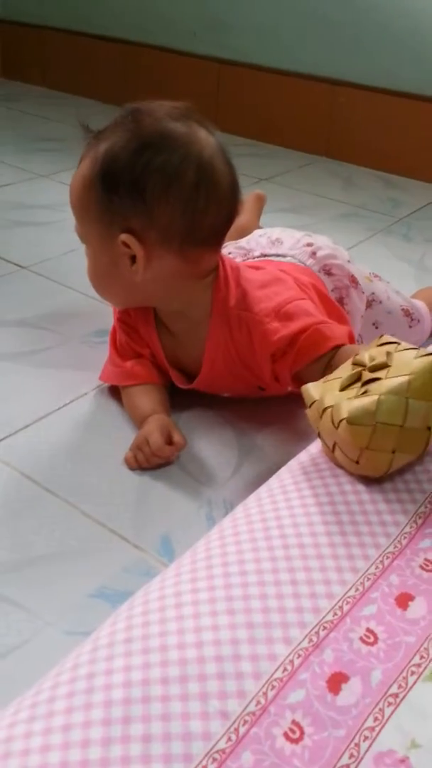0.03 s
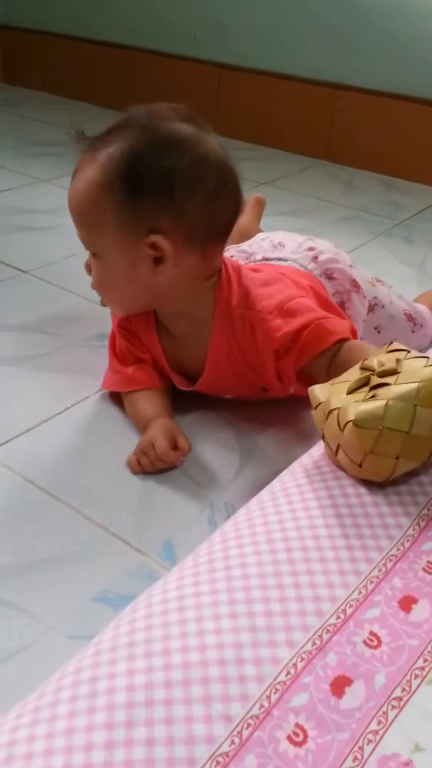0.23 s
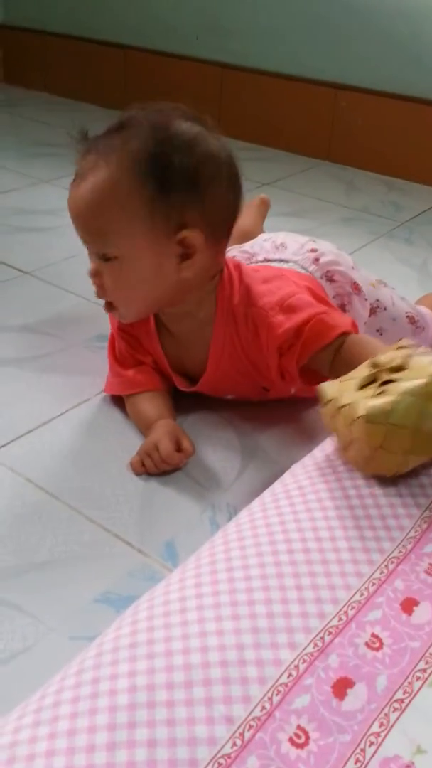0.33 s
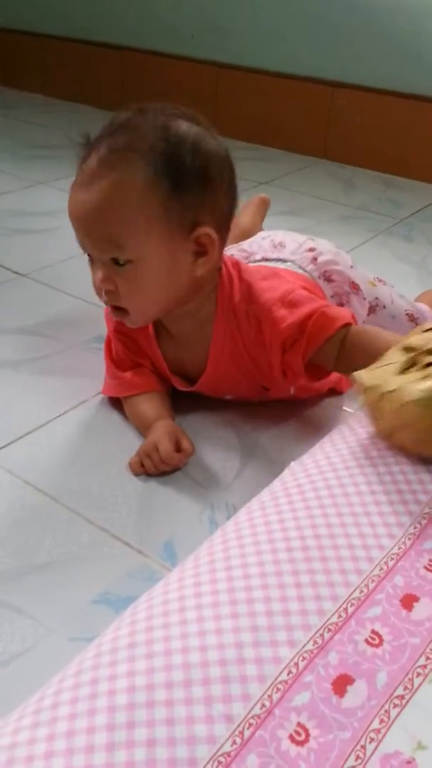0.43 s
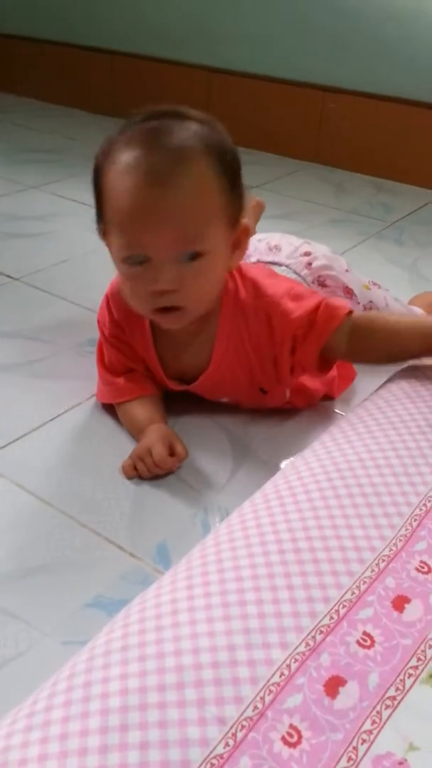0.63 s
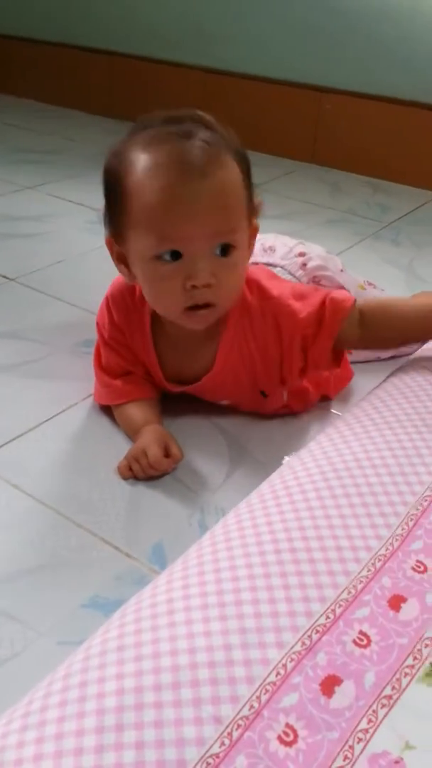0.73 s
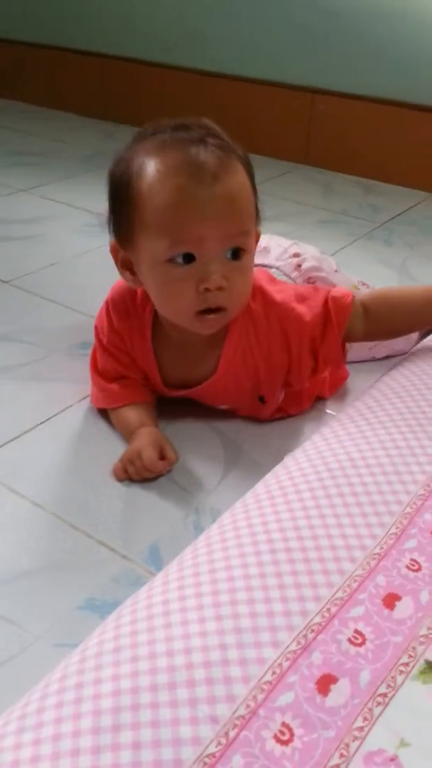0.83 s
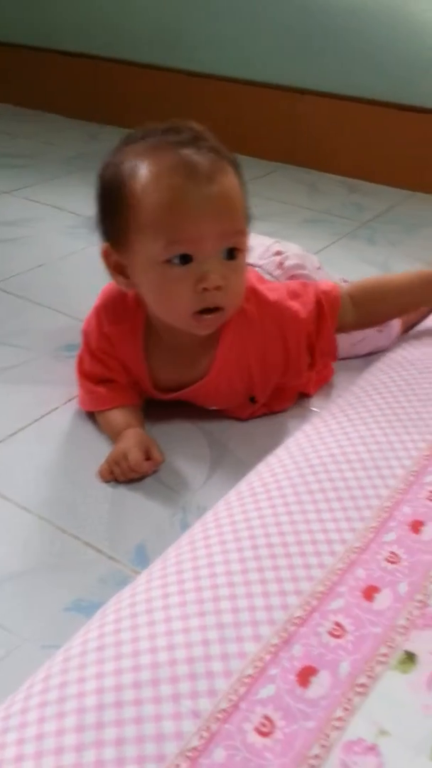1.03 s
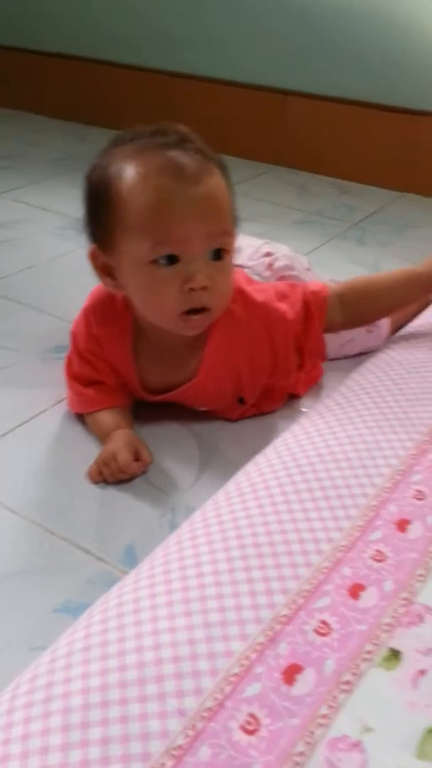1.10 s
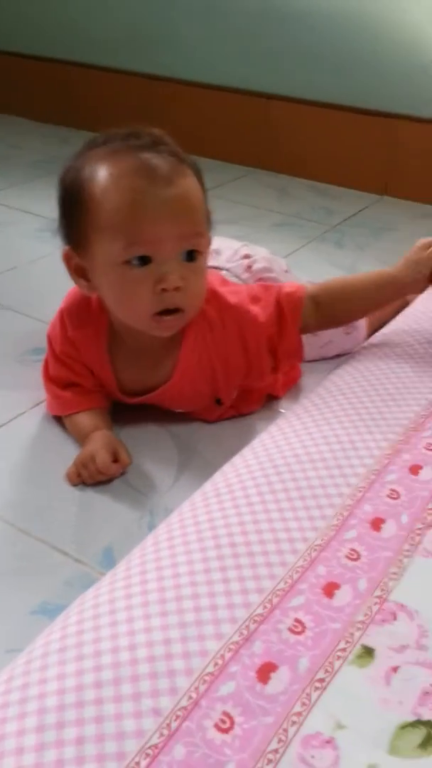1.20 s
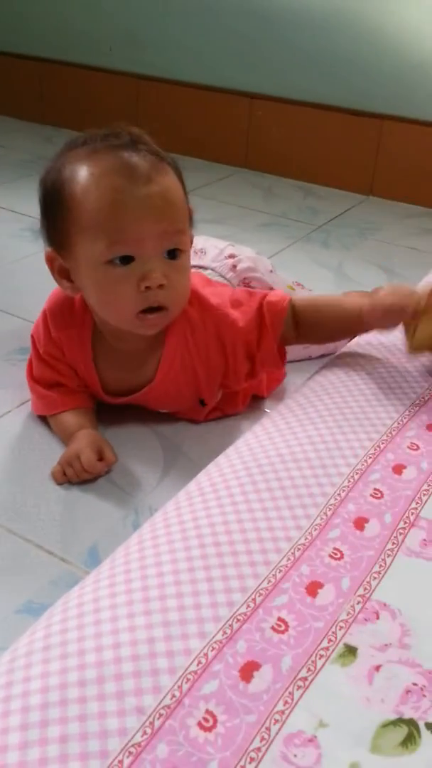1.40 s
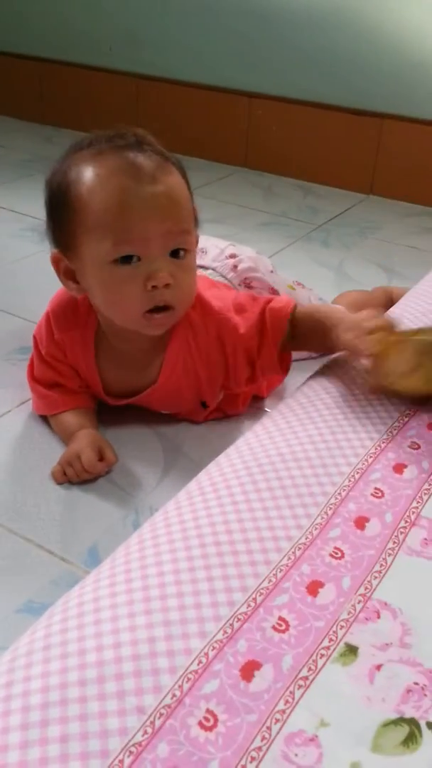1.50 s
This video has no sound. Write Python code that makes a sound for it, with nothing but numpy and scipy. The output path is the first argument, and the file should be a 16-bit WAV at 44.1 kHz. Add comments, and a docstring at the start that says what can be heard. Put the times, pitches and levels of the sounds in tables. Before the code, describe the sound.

A woven basket thumps onto a thin mat at about 0.25 seconds, its dry strips snapping and creaking. From 0.4 to 1.1 seconds it scrapes over the cloth with a hiss, soft bumps and a faint hollow rumble; a zipping tone rises until 0.8 seconds, then falls away. Light brushes and a soft bump follow around 1.3 to 1.6 seconds in a small quiet room.

```python
"""Palm-leaf basket dropped and dragged

A woven basket thumps onto a thin mat over tiles; its dry strips snap and creak. Dragged across the
cloth, the strips hiss and tick over the threads: a zipping tone that rises and falls with the speed.
The stiff rim sings, the cavity hums, light brushes follow.
Small quiet room, two small microphones with peaky treble."""
import sys
import numpy as np
from scipy import signal
from scipy.fft import rfft, irfft, next_fast_len
from scipy.io import wavfile
from scipy.ndimage import uniform_filter1d

SR = 44100
rng = np.random.default_rng(int(sys.argv[2]) if len(sys.argv) > 2 else 0)


def int16_out(signal):
    """Quantize to a 16-bit WAV file."""
    q = np.round(np.clip(np.atleast_2d(signal).T, -1, 1) * 32767)
    wavfile.write(sys.argv[1], SR, q.astype(np.int16))


N = 68355
TIME_S = np.arange(N) / SR

# Room decay: freq_hz, t60_s
ROOM_DECAY = [(60, 0.31), (250, 0.13), (1000, 0.23), (4000, 0.14), (15000, 0.091)]
# Left-right likeness: freq_hz, coherence
COHERENCE = [(60, 0.84), (200, 0.95), (400, 0.88), (700, 0.019), (1300, 0.33), (2300, 0), (15000, 0)]
# Room air: freq_hz, density_db
AIR_SPECTRUM = [(20, -51.5), (45, -6.5), (68, -5.5), (110, -5.5), (220, -14), (400, -15), (1000, -24.5),
                (3000, -27), (5500, -28), (7000, -31), (9000, -35), (12500, -27), (13900, -23.5),
                (14700, -34)]
# Faint background tones: pitch_hz, level_db, start_s
FAINT_TONES = [(215, -81.5, 0.055), (880, -88.5, 0.98), (855, -80, 1.25), (1625, -83, 1.306)]
# Strokes on the cloth: peak_s, level_db, rise_s, fall_s
BRUSH_STROKES = [(.19, -74, 0.059, 0.09), (0.286, -51, 0.0069, 0.01), (1.318, -64, 0.047, .04),
                 (1.464, -54, 0.0095, 0.042), (1.548, -50, 0.041, .06)]
# Brush friction: freq_hz, density_db
BRUSH_SPECTRUM = [(60, 2), (300, 3.5), (700, 1.5), (1500, 1), (2300, -2), (3200, -1), (4100, -3), (5700, 2),
                  (7500, 3), (10000, -4), (15000, -2)]
# Soft floor bumps: peak_s, level_db, half_width_s
FLOOR_BUMPS = [(0.128, -68, 0.022), (0.525, -42, 0.0086), (0.621, -50.5, 0.025), (1.396, -54.5, 0.015)]
# Rim swish: freq_hz, density_db
RIM_SPECTRUM = [(1000, -35), (3900, -13.5), (4700, 3), (5500, 1.5), (6200, -24), (9000, -38)]
# Surges of the cavity note: peak_s, level_db, half_width_s
CAVITY_SURGES = [(0.664, -48.5, 0.065), (0.769, -43.5, 0.03)]
# Landing blows: start_s, thud_db, contact_s, crack_db
LANDING_BLOWS = [(0.244, -50.5, 0.0024, -41), (0.2468, -28, 0.0015, -39.5), (.2534, -38, 0.006, -41.5),
                 (0.2626, -18.5, 0.0025, -33)]
# Basket on the padded floor: freq_hz, level_db, t60_s
BASKET_MODES = [(75.4, -13.5, 0.11), (108.6, -4, 0.12), (158, -2.5, 0.1), (222, -13, 0.26),
                (278, 2.5, 0.029), (381, -10.5, 0.052), (670, -8, 0.041)]
# Snap of dry strips: freq_hz, density_db
CRACK_SPECTRUM = [(200, 2.5), (600, 7), (1300, 3), (1600, -4), (2200, 2.5), (3400, -8.5), (5200, -0.5),
                  (6300, -9), (7600, -12), (10500, -21.5), (15000, -17)]
# Drag force as levels: time_s, hiss_db, zip_db, rumble_db
DRAG_LEVELS = [(0.299, -66, -100, -69), (0.352, -61, -89, -70), (0.432, -47.5, -64.5, -55.5),
               (0.478, -43.5, -57, -74), (0.518, -39, -45.5, -49), (.59, -38.5, -51, -48.5),
               (0.651, -37, -43.5, -52), (0.696, -38, -50, -49), (0.734, -37, -37, -52),
               (.778, -35, -41.5, -48.5), (0.814, -36.5, -39, -48), (.838, -36, -48, -50.5),
               (0.866, -39.5, -38.5, -52.5), (.922, -40.5, -48.5, -50), (.955, -41, -67, -53),
               (1.014, -43, -51.5, -56), (1.052, -50, -48, -51), (1.094, -59.5, -61, -57.5),
               (1.135, -82, -94, -101)]
# Drag speed as threads crossed: time_s, rate_hz
THREAD_RATE = [(.30, 250), (.43, 720), (.49, 880), (.535, 935), (.60, 900), (.655, 925), (.695, 1020),
               (.72, 1160), (.745, 1230), (.775, 1530), (.805, 1560), (.825, 1660), (.865, 1390),
               (.905, 1160), (.93, 900), (1.01, 570), (1.045, 405), (1.075, 330), (1.135, 130)]
# Hiss before the basket swings round: freq_hz, density_db
EARLY_HISS_SPECTRUM = [(400, -8.5), (700, -7), (1100, 5.5), (1500, -2.5), (1850, 2), (2900, -4.5),
                       (3800, -2), (4700, -1.5), (5600, 0.5), (6200, -1), (7500, 4.5), (10000, -4),
                       (12500, -6.5), (15000, -11.5)]
# Hiss after the swing: freq_hz, density_db
LATE_HISS_SPECTRUM = [(400, -10.5), (700, -1.5), (1100, 0.5), (1850, 1.5), (2500, -1.5), (3500, -4.5),
                      (4800, 0.5), (5600, 1), (6150, 7), (6700, -0.5), (7700, -1), (10000, -6),
                      (12500, -8.5), (15000, -9)]
# Rumble of the hollow basket: freq_hz, density_db
RUMBLE_SPECTRUM = [(20, -52), (40, -13), (65, -4), (110, -5.5), (200, 0), (260, 1.5), (315, 0.5),
                   (380, -1.5), (450, -2.5), (620, -9.5), (1200, -43), (4000, -69)]
# Left microphone: freq_hz, gain_db
LEFT_RESPONSE = [(60, 0.5), (200, 0), (450, 0), (850, -2.5), (2000, 1.5), (3500, -3), (4600, 2.5),
                 (5750, 4.5), (6900, 0.5), (7600, -5.5), (9400, -2.5), (10200, 4), (12000, -3),
                 (14300, -0.5)]
# Right microphone: freq_hz, gain_db
RIGHT_RESPONSE = [(60, 3.5), (200, 0.5), (450, -6.5), (850, 0.5), (2100, -3.5), (3400, -1.5), (4600, -0.5),
                  (5600, -3), (6450, 1), (7000, 9), (7750, 10.5), (8400, 8), (9000, 7), (10300, 1),
                  (14300, -3)]


def amp(db):
    """Decibels to gain."""
    return 10 ** (np.asarray(db) / 20)


def unit_rms(x):
    """Scale to rms 1."""
    return x / np.sqrt(np.mean(x ** 2) + 1e-20)


def lookup(table, hz):
    """Interpolate on a log-frequency axis."""
    freq_hz, values = np.transpose(table)
    return np.interp(np.log(hz + 1), np.log(freq_hz + 1), values)


def add(mix, start_s, sound):
    """Mix a sound in at start_s."""
    part = mix[..., round(start_s * SR):][..., :sound.shape[-1]]
    part += sound[..., :part.shape[-1]]


def swell(peak_s, half_width_s):
    """Gaussian envelope, 1/e at half_width_s from the peak."""
    return np.exp(-((TIME_S - peak_s) / half_width_s) ** 2)


def phase(hz):
    """Running phase of a varying frequency, in radians."""
    return 2 * np.pi * np.cumsum(hz) / SR


def colour(x, spectrum):
    """Minimum-phase filter with the given spectrum."""
    size = 8192
    log_gain = np.log(amp(lookup(spectrum, abs(np.fft.fftfreq(size, 1 / SR)))))
    response = np.exp(np.conj(signal.hilbert(log_gain)))
    taps = np.fft.ifft(response).real[:size // 2]
    return signal.fftconvolve(x, taps.reshape((1,) * (x.ndim - 1) + (-1,)), axes=-1)[..., :x.shape[-1]]


def cohere(x):
    """Make two independent channels alike in the bass."""
    left, other = rfft(x)
    coherence = lookup(COHERENCE, np.fft.rfftfreq(x.shape[1], 1 / SR))
    right = coherence * left + np.sqrt(1 - coherence ** 2) * other
    return irfft([left, right], x.shape[1])


def wander(hz):
    """Random drift of rms 1, low-passed at hz."""
    size = next_fast_len(N)
    rolloff = 1 + (np.fft.rfftfreq(size, 1 / SR) / hz) ** 4
    return unit_rms(irfft(rfft(rng.standard_normal(size)) / rolloff, size)[:N])


def slips(spectrum, rate_hz=9000, spread_db=2.5):
    """Friction: dense, uneven micro-slips of leaf on fibre."""
    size_db = spread_db * np.minimum(rng.exponential(1, (2, N)), 5)
    signs = rng.choice([-1, 1], (2, N))
    slipping = rng.random((2, N)) < rate_hz / SR
    return unit_rms(colour(cohere(amp(size_db) * signs * slipping), spectrum))


def room(x, wet_db, build_s=0.0035):
    """Direct sound plus the short tail of the tiled room."""
    hz, t, noise = signal.stft(cohere(rng.standard_normal((2, SR // 2))), SR, nperseg=256)
    decay = amp(-60 * t / lookup(ROOM_DECAY, hz)[:, None])
    tail = signal.istft(noise * decay, SR, nperseg=256)[1]
    tail *= np.minimum(np.arange(tail.shape[1]) / SR / build_s, 1) ** 2
    tail /= np.linalg.norm(tail[0])
    return x + amp(wet_db) * signal.fftconvolve(np.atleast_2d(x), tail, axes=1)[:, :N]


def room_tone(air_db=-69, waver_hz=22, flicker_db=3, fade_in_s=0.09):
    """Low murmur of air, thin hiss, faint tones that waver and flicker."""
    out = amp(air_db) * unit_rms(colour(cohere(rng.standard_normal((2, N))), AIR_SPECTRUM))
    for pitch_hz, level_db, start_s in FAINT_TONES:
        tone = np.sqrt(2) * np.cos(phase(pitch_hz + waver_hz * wander(hz=60.4)))
        fade_in = np.clip((TIME_S - start_s) / fade_in_s, 0, 1)
        out += amp(level_db + flicker_db * wander(hz=25)) * fade_in * tone
    return out


def brushes():
    """Hand and basket stroke the cloth lightly."""
    envelope = sum(amp(level_db) * swell(peak_s, np.where(TIME_S < peak_s, rise_s, fall_s))
                   for peak_s, level_db, rise_s, fall_s in BRUSH_STROKES)
    return room(slips(BRUSH_SPECTRUM) * envelope * amp(wander(hz=119.8)), wet_db=-6.5)


def bumps(pitch_hz=75):
    """Padded knocks on the floor, a few low cycles each."""
    out = np.zeros(N)
    for peak_s, level_db, half_width_s in FLOOR_BUMPS:
        tone = np.sin(2 * np.pi * pitch_hz * (TIME_S - peak_s))
        out += amp(level_db) * swell(peak_s, half_width_s) * tone
    return room(out, wet_db=-6.5)


def rim(level_db=-53.5):
    """The stiff rim sings, a narrow swish, as the slide starts."""
    landed = TIME_S > LANDING_BLOWS[0][0]
    envelope = swell(peak_s=0.51, half_width_s=0.14) * landed
    return slips(RIM_SPECTRUM) * amp(level_db + wander(hz=60)) * envelope


def cavity(pitch_hz=315, waver_hz=22):
    """The hollow basket is rubbed into a wavering note while the pull is hardest."""
    envelope = sum(amp(level_db) * swell(peak_s, half_width_s)
                   for peak_s, level_db, half_width_s in CAVITY_SURGES)
    note = np.sqrt(2) * np.cos(phase(pitch_hz + waver_hz * wander(hz=97)))
    return room(envelope * note, wet_db=-8)


def landing(snap_db=12.5, crack_t60_s=0.0064, creak_db=-11.5, creak_t60_s=0.21):
    """Each blow rings the low modes and snaps the dry strips, which creak as they settle."""
    t = np.arange(SR // 2) / SR
    thuds, cracks = np.zeros(N), np.zeros((2, N))
    impulse = 1. * (t == 0)
    ring = -sum(amp(db - 60 * t / t60_s) * np.cos(2 * np.pi * hz * t) for hz, db, t60_s in BASKET_MODES)
    splinter_decay = amp(4 - 60 * t / crack_t60_s) + amp(creak_db - 60 * t / creak_t60_s)
    filter_gain = np.linalg.norm(colour(impulse, CRACK_SPECTRUM))
    for start_s, thud_db, contact_s, crack_db in LANDING_BLOWS:
        force = t * np.exp(-4 * t / contact_s)
        thud = signal.fftconvolve(ring, force / force.sum())[:len(t)]
        add(thuds, start_s, amp(thud_db) * thud)
        splinters = cohere(rng.standard_normal((2, len(t)))) * splinter_decay
        crack = colour(splinters + amp(snap_db) * impulse, CRACK_SPECTRUM) / filter_gain
        add(cracks, start_s, amp(crack_db) * crack)
    cracks *= amp([[1], [-1]])  # slightly left
    return room(thuds, wet_db=-14.5) + room(cracks, wet_db=-15.5)


def strip_hiss(swing_s=0.757, swing_half_width_s=0.053):
    """Strips rub the fabric, slightly right; the colour shifts as the basket swings round."""
    turned = 0.5 + 0.5 * np.tanh((TIME_S - swing_s) / swing_half_width_s)
    early = slips(EARLY_HISS_SPECTRUM) * amp([[-0.88], [0.88]])
    late = slips(LATE_HISS_SPECTRUM) * amp([[-0.5], [0.5]])
    return np.sqrt(1 - turned) * early + np.sqrt(turned) * late


def strip_tone(speed_ratio, wobble=0.034, grip_db=6, overtone_db=-18.5):
    """One strip ticks over the threads with unsteady speed and grip."""
    thread_hz = np.interp(TIME_S, *np.transpose(THREAD_RATE))
    angle = phase(thread_hz * (speed_ratio + wobble * wander(hz=118)))
    grip = amp(grip_db * np.tanh(wander(hz=71.6)))
    return grip * (np.cos(angle) + amp(overtone_db) * np.cos(2 * angle))


def thread_zip(speed_spread=0.15, fast_db=-15, slow_db=-20):
    """Zip of a leading strip, a faster and a slower one."""
    fast = amp(fast_db) * strip_tone(1 + speed_spread)
    slow = amp(slow_db) * strip_tone(1 - speed_spread)
    return unit_rms(strip_tone(1) + fast + slow)


def drag(hiss_trim_db=-2.5, zip_trim_db=-2, hiss_flicker_db=0.52, rumble_flicker_db=2):
    """The basket slides: hiss, zip and hollow rumble follow the pull."""
    times_s, *levels_db = np.transpose(DRAG_LEVELS)
    hiss_db, zip_db, rumble_db = (np.interp(TIME_S, times_s, column) for column in levels_db)
    moving = (TIME_S > times_s[0]) & (TIME_S < times_s[-1])
    gate = uniform_filter1d(1. * moving, size=600)
    hiss = strip_hiss() * amp(hiss_db + hiss_trim_db + hiss_flicker_db * wander(hz=89))
    zipping = thread_zip() * amp(zip_db + zip_trim_db)
    rumble = slips(RUMBLE_SPECTRUM) * amp(rumble_db + rumble_flicker_db * wander(hz=35))
    return room(gate * (hiss + zipping + rumble), wet_db=-9)


def scene():
    """Stereo sum of all sources."""
    return landing() + bumps() + drag() + rim() + cavity() + brushes() + room_tone()


def record(dry, low_cut_hz=39.5, band_limit_hz=14580):
    """Microphone colour, low cut, band limit."""
    heard = np.array([colour(dry[0], LEFT_RESPONSE), colour(dry[1], RIGHT_RESPONSE)])
    highpass = signal.butter(3, low_cut_hz, "high", fs=SR, output="sos")
    lowpass = signal.firwin(511, band_limit_hz, window=("kaiser", 9), fs=SR)
    return signal.oaconvolve(signal.sosfilt(highpass, heard), lowpass[None], "same")


dry = scene()
out = record(dry)
int16_out(out)
```